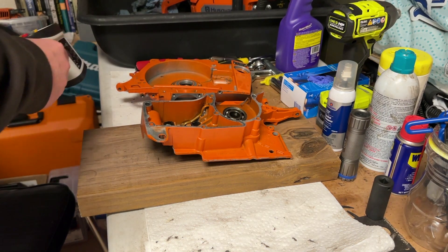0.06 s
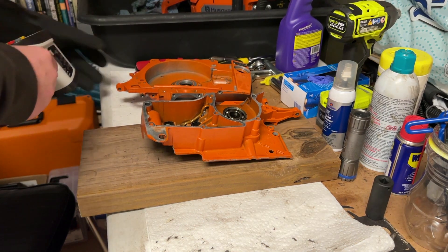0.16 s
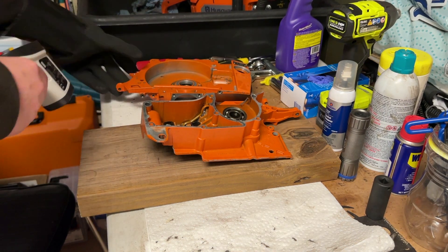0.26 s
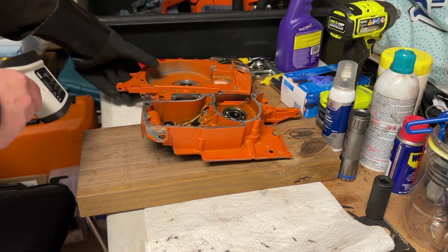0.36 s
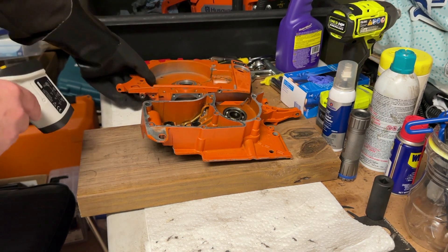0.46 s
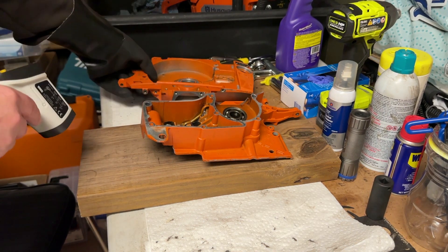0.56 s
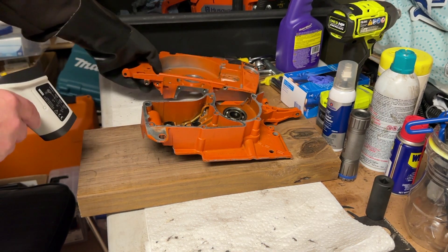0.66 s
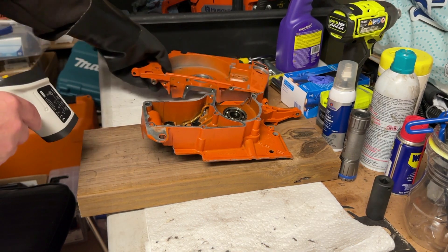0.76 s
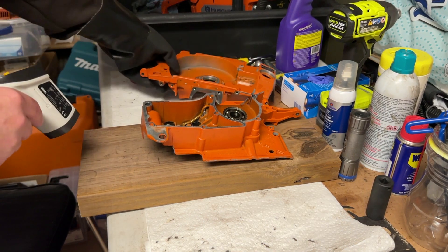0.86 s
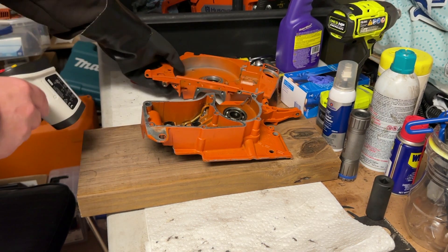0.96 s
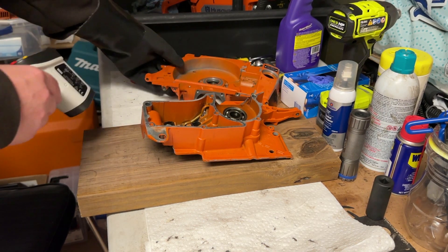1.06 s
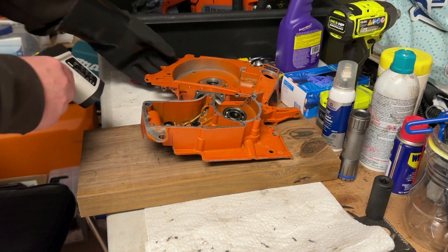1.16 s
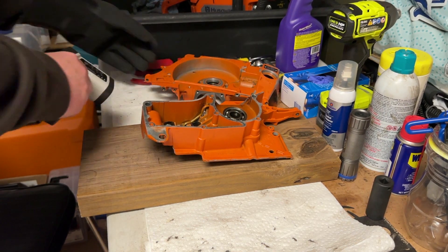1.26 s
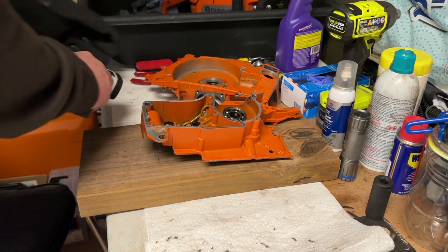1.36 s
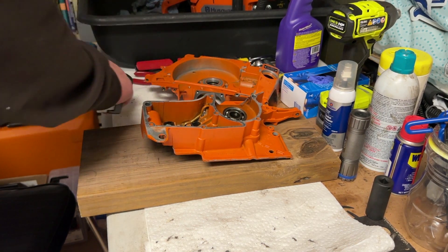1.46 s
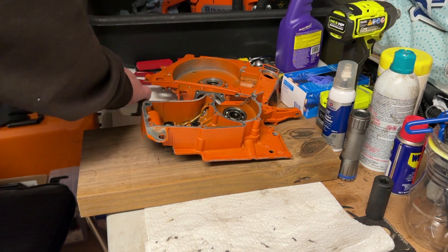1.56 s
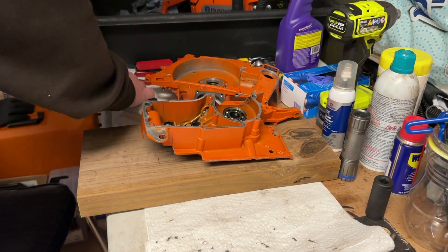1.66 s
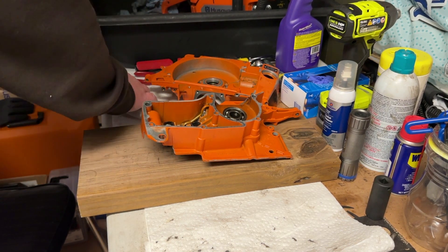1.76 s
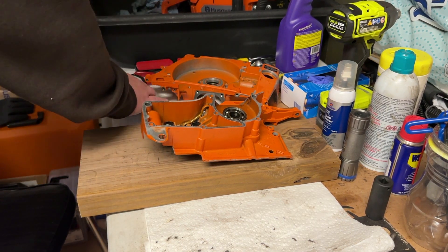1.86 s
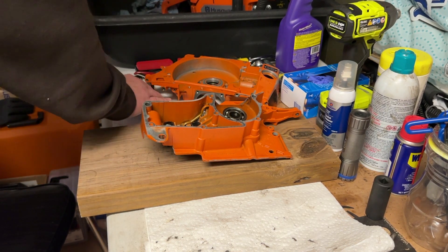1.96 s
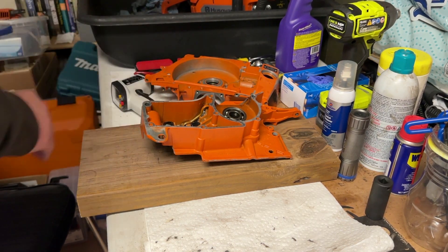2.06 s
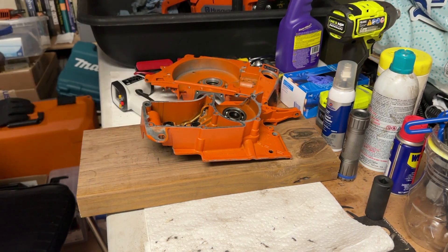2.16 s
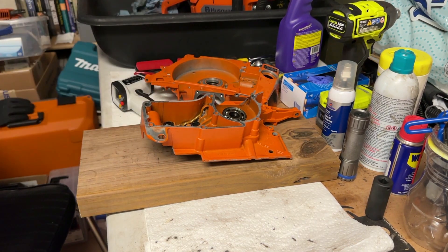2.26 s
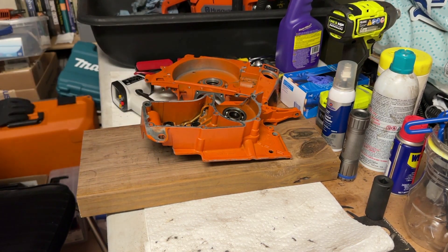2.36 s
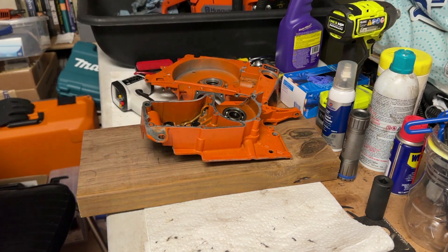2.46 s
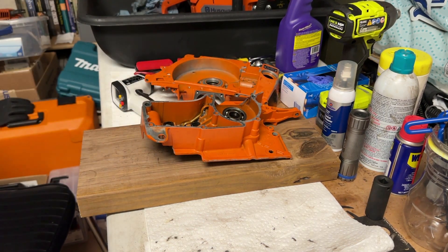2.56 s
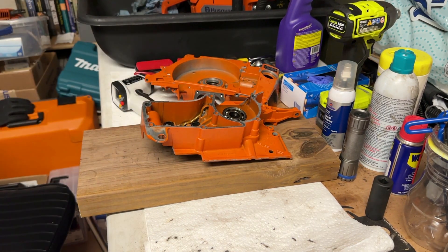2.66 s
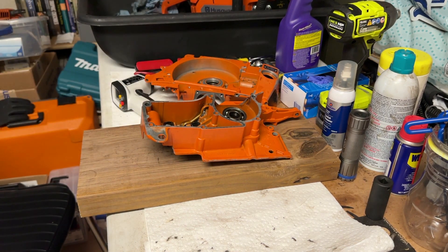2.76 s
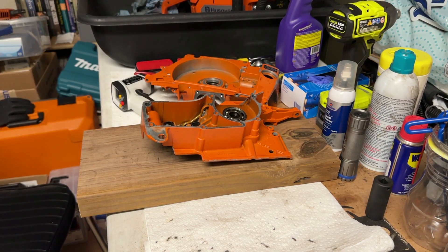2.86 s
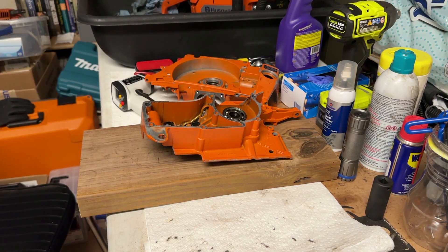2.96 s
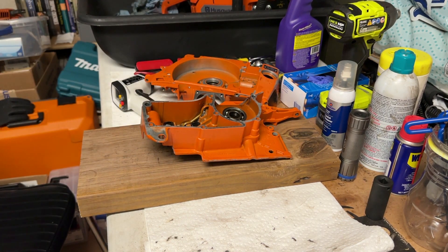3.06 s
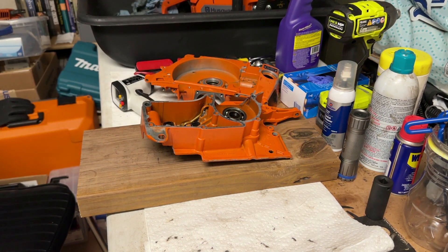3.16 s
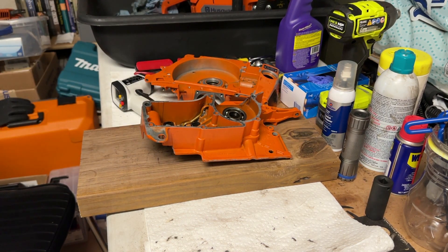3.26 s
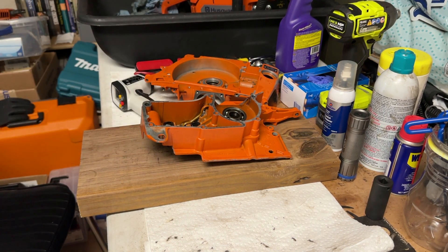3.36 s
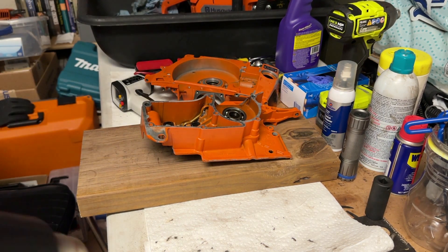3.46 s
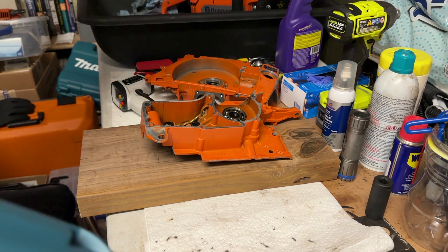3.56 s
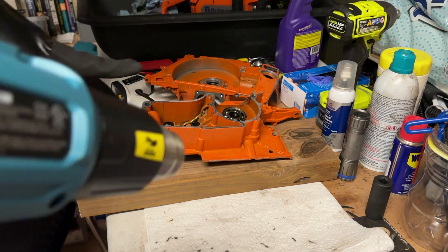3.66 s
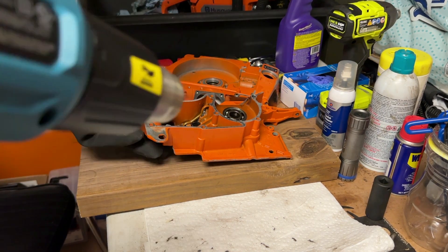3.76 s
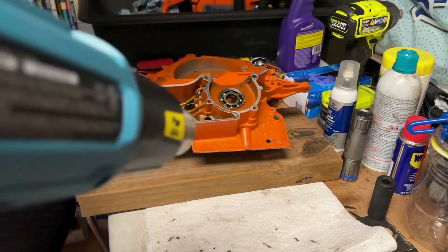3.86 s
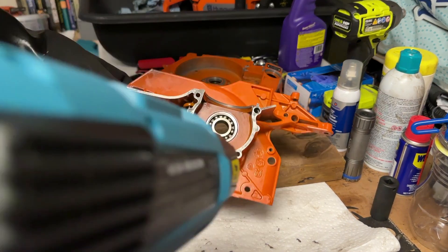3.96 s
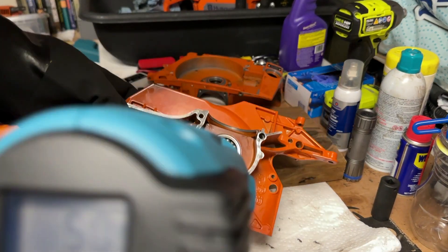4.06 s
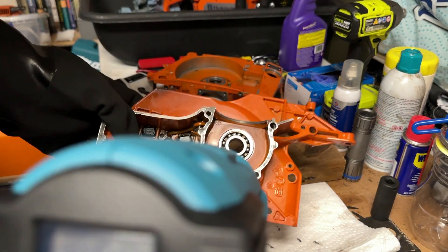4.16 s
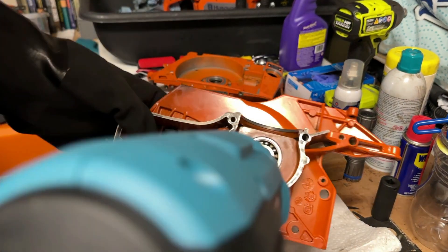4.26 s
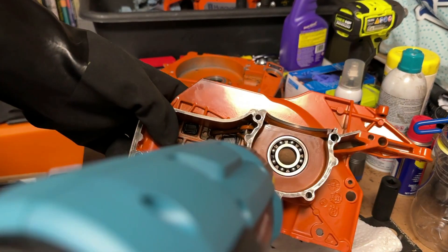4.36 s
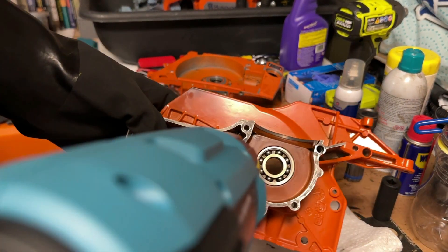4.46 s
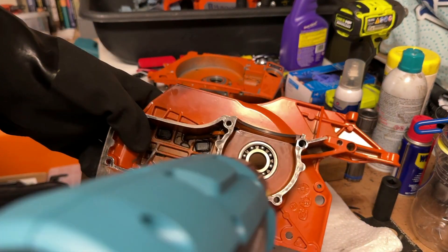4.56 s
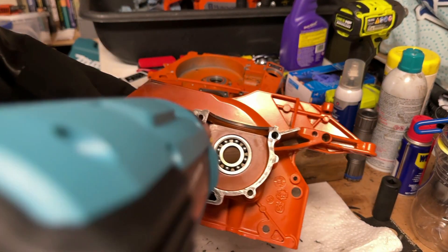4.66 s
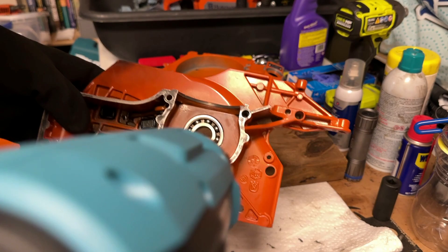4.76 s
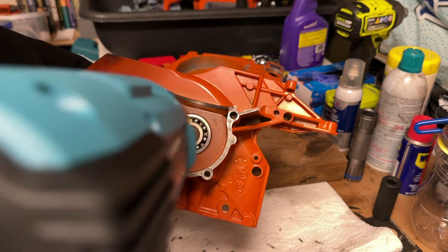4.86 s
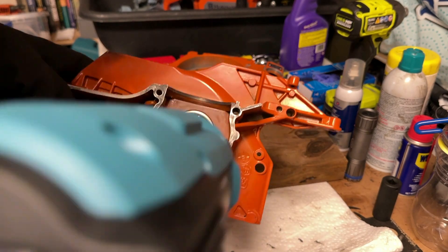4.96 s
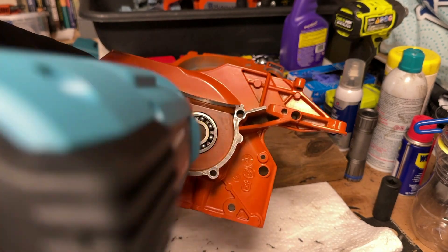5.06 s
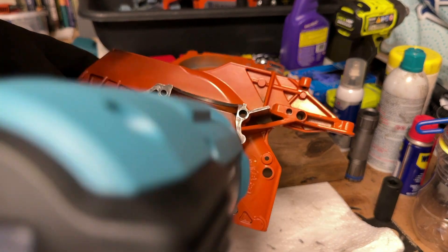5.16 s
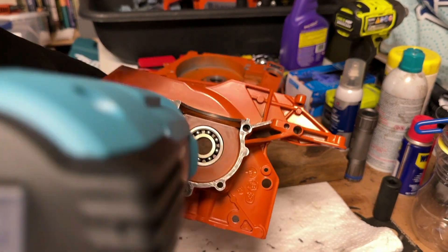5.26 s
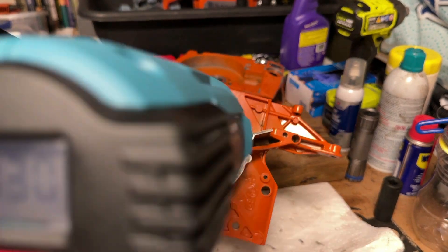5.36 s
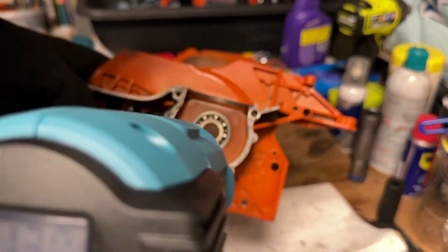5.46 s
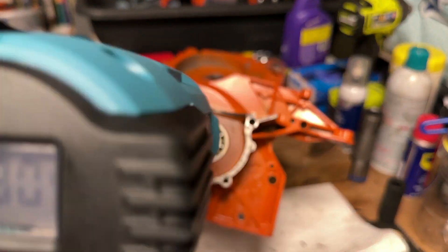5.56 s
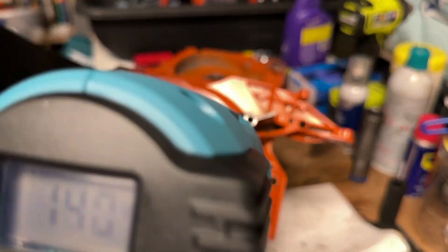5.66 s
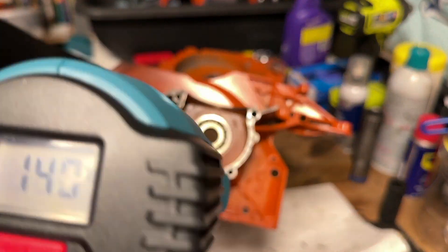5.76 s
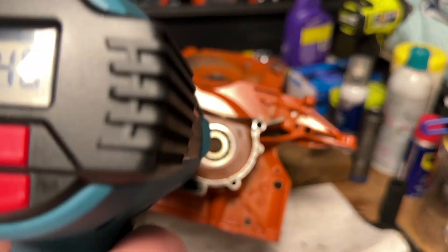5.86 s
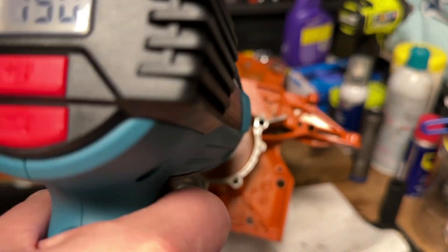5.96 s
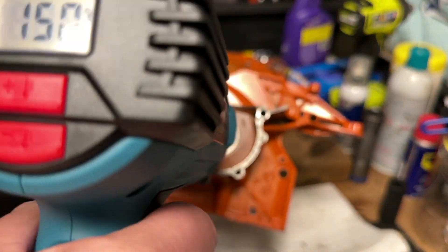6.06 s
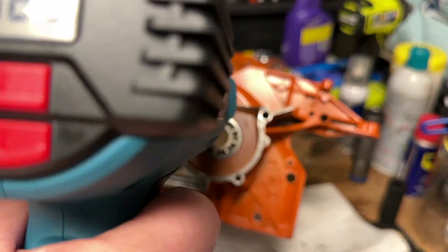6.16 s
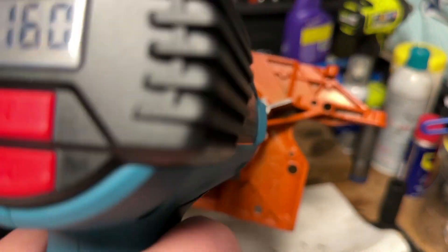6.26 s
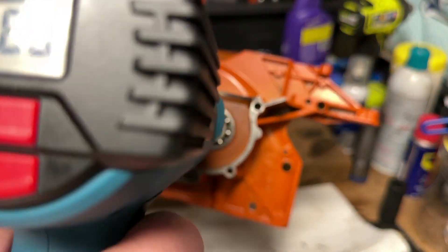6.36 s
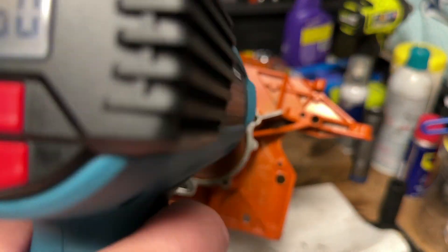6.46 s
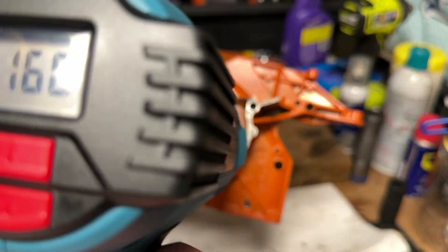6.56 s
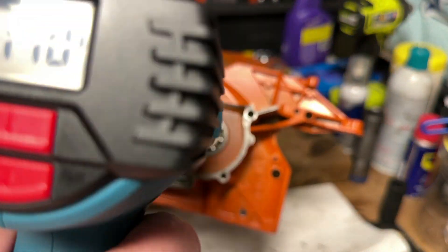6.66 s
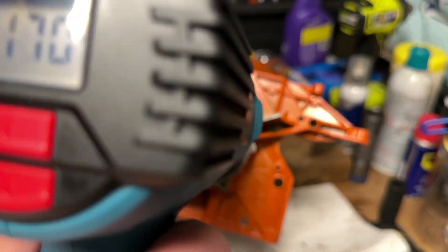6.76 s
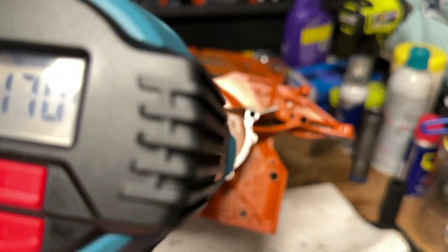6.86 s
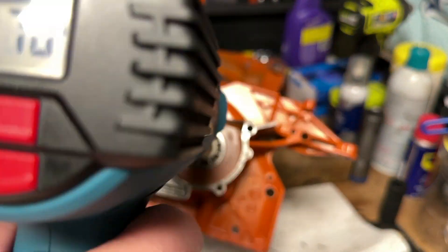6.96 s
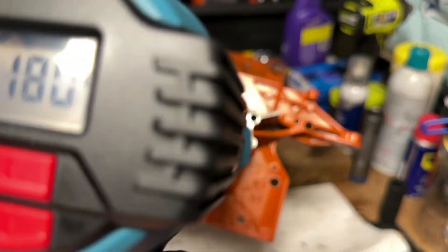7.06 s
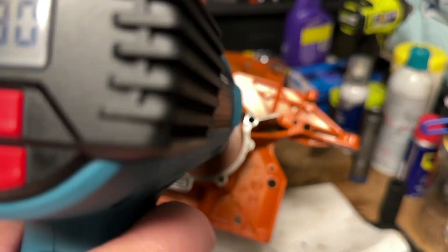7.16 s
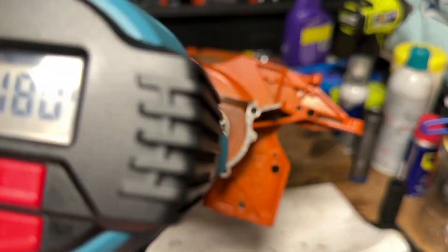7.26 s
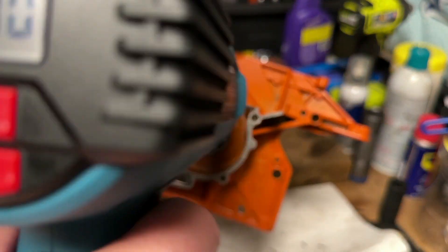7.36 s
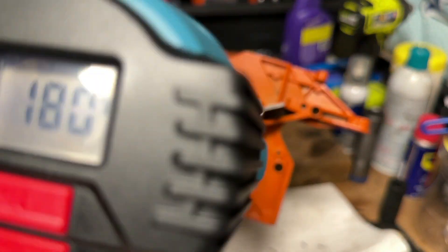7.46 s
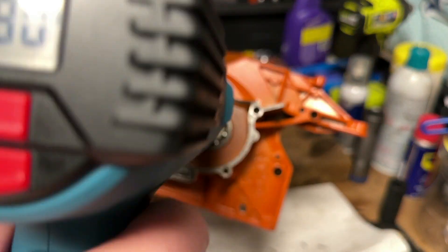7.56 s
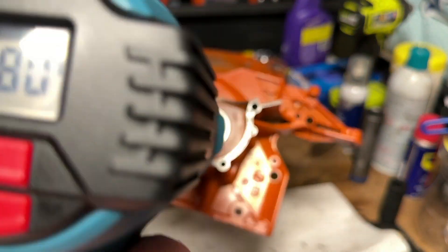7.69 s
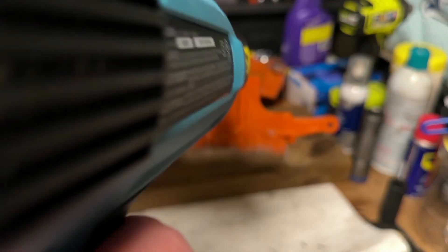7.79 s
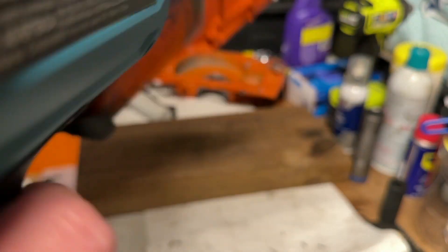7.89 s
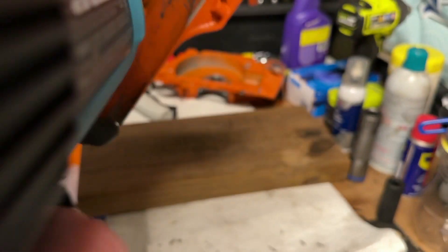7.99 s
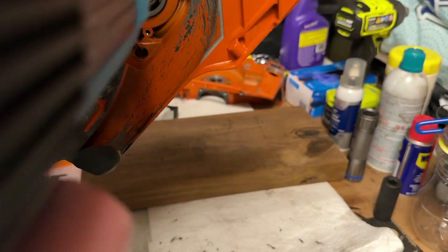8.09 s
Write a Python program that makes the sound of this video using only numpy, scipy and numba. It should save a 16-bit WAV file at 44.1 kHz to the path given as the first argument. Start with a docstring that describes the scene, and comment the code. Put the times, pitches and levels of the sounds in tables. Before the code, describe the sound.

After a metal clack, light knocks and rustling sleeves, a nearby heat gun switches on and blows steadily with a thin whine.

```python
"""Knocks on a wooden workbench, over faint workshop background: ahead of a stereo microphone a cast metal
engine case is shifted and set down with a ringing clack. Sleeves swish and things scrape over the bench.
Then a heat gun is switched on close by, to the left: its small motor spins up to about 223 turns a
second, the fan roars through the barrel and the motor whines, louder or softer as the gun is turned."""
import sys
import numpy as np
from scipy import signal
from scipy.fft import rfft, irfft, next_fast_len
from scipy.io import wavfile
from scipy.ndimage import uniform_filter1d
from numba import njit

SR = 44100
rng = np.random.default_rng(int(sys.argv[2]) if len(sys.argv) > 2 else 0)


def generate_wav(signal):
    """Clip the signal to [-1, 1] and save it as 16-bit WAV at the path in sys.argv[1]."""
    frames = np.transpose(np.atleast_2d(signal))
    scaled = np.clip(frames, -1, 1) * 32767
    pcm = np.round(scaled).astype(np.int16)
    wavfile.write(sys.argv[1], SR, pcm)


N = 358533
TIME = np.arange(N) / SR


def undb(db):
    """Decibels to gain."""
    return 10 ** (np.asarray(db) / 20)


def unit(x):
    """Scale to rms 1."""
    return x / np.sqrt(np.mean(x ** 2))


def over_time(table):
    """A (time, value) table, sample by sample."""
    return np.interp(TIME, *np.transpose(table))


def at_frequency(table, hz):
    """Value of a (frequency, value) table on a log-frequency axis."""
    f, value = np.transpose(table)
    return np.interp(np.log(np.maximum(hz, 1)), np.log(f), value)


def noise(colour, size=N):
    """Two unrelated noises of one colour, at rms 1."""
    n = next_fast_len(size, True)
    gain = undb(at_frequency(colour, np.fft.rfftfreq(n, 1 / SR)))
    spectrum = rfft(rng.standard_normal((2, n))) * gain
    return unit(irfft(spectrum, n)[:, :size])


def wander(rate_hz):
    """Random values held for 1 / rate_hz seconds and smoothed twice, at rms 1."""
    hold = int(SR / rate_hz)
    steps = np.repeat(rng.standard_normal(N // hold + 1), hold)
    return unit(uniform_filter1d(uniform_filter1d(steps, hold), hold)[:N])


@njit
def bandpass(x, hz, width):
    """State-variable band-pass with a moving centre."""
    y, band_state, low_state = np.empty(len(x)), 0., 0.
    for i in range(len(x)):
        g, damping = np.tan(np.pi * hz[i] / SR), width / hz[i]
        band = (band_state + g * (x[i] - low_state)) / (1 + g * (g + damping))
        band_state, low_state = 2 * band - band_state, low_state + 2 * g * band
        y[i] = damping * band
    return y


def resonance(hz, width):
    """Two unrelated noises in one steep resonance, whose centre may move."""
    hz, width = hz + np.zeros(N), float(width)
    white = rng.standard_normal((2, N))
    return unit(np.array([bandpass(bandpass(x, hz, width), hz, width) for x in white]))


def sine(hz, t, shape=None):
    """A sine of random phase; shape (2, 1) gives a pair."""
    return np.sin(2 * np.pi * hz * t + rng.uniform(0, 2 * np.pi, shape))


def fade(t, t60):
    """Exponential decay, 60 dB down after t60 seconds."""
    return np.exp(-np.log(1000) * t / t60)


def swell(s, length):
    """A smooth rise and fall around time s, halved a quarter of its length either side."""
    return 1 / np.cosh(np.clip(5.3 * (TIME - s) / length, -30, 30))


def add(out, s, sound):
    """Mix a sound in at time s."""
    i = int(s * SR)
    out[..., i:i + sound.shape[-1]] += sound[..., :N - i]


def microphone(pair, likeness, balance, left_lead=None):
    """Spread a common part (row 0) and a differing part (row 1) over the left and right ports."""
    n = next_fast_len(N + SR // 10, True)
    hz = np.fft.rfftfreq(n, 1 / SR)
    alike = np.clip(at_frequency(likeness, hz), 0, 1)
    ratio = undb(at_frequency(balance, hz))
    common, differing = rfft(pair, n)
    common, differing = common * np.sqrt(1 + alike), differing * np.sqrt(1 - alike)
    lag = 1 if left_lead is None else np.exp(-1j * at_frequency(left_lead, hz))
    left, right = (common + differing) * ratio, (common - differing) * lag
    return irfft(np.array([left, right]) / np.sqrt(1 + ratio ** 2), n)[:, :N]


# room tone at the bench: (frequency [Hz], relative density [dB])
ROOM_COLOUR = [(25, -7.5), (60, -1), (120, -0.5), (250, -6.5), (400, -11), (560, -10.5), (800, -18),
               (1900, -21), (4000, -28), (8000, -27.5), (9700, -23), (11500, -31.5), (16000, -32.5)]
# its course: (time [s], level [dB])
ROOM_LEVEL = [(0, -60), (2.03, -65), (2.1, -67.5), (3.4, -71.5)]


def room_tone(waver_db=.76):
    """The workshop's faint, low background noise wavers and sinks."""
    return noise(ROOM_COLOUR) * undb(over_time(ROOM_LEVEL) + waver_db * wander(4.6))


# modes of the engine case on the bench: (frequency [Hz], relative level [dB], t60 [s])
CASE_MODES = [(339, -5.5, 0.09), (678, -5, 0.06), (884, -2, 0.1), (1105, -3.5, .12), (1390, -17, .15),
              (2110, 7, .07), (2220, -0.5, 0.1), (2673, -3, .12), (2754, -5, .1), (3181, -4, .08),
              (3580, -3.5, .15), (3660, -2, .12), (4060, -3, 0.099), (4530, 3, .09), (4590, -33.5, .45),
              (5600, -6, .1), (6000, -8.5, .12), (6510, 1.5, 0.12), (7000, -7, .1), (7630, -4, .12),
              (7900, -13, 0.092), (9500, -16.5, .07)]


def case_ring(t):
    """Struck cast metal rings in decaying modes, with new phases at each blow."""
    return sum(undb(db) * fade(t, t60) * sine(hz, t, (2, 1)) for hz, db, t60 in CASE_MODES)


# knocks ahead of the microphone: (time [s], boom [dB], boom pitch [Hz], thud [dB], tick [dB], ring [dB])
KNOCKS = [(.425, -76, 200, -46.5, -55.5, -69), (.463, -67, 150, -48, -49.5, -67),
          (0.515, -33, 87, -31, -44, -51), (.595, -47, 110, -53, -52.5, -51),
          (0.821, -27.5, 84, -30.5, -34.5, -42), (.85, -42, 160, -38.5, -50, -47),
          (0.908, -40, 150, -37, -33.5, -40.5), (.934, -35, 200, -29, -48, -56),
          (1.087, -32, 88, -39.5, -50.5, -65), (1.605, -59, 150, -66.5, -76, -69),
          (1.725, -85, 151, -59.5, -63, -82), (1.855, -46, 126, -69, -53, -61),
          (1.935, -33.5, 160, -51.5, -51.5, -69), (2.265, -47.5, 260, -54.5, -63, -73),
          (2.577, -63, 139.5, -58.5, -66, -78), (3.945, -48.5, 110, -41, -57, -70)]
# modes of the wooden top: (frequency [Hz], relative level [dB], t60 [s])
BENCH_MODES = [(58, -15, 0.22), (75.7, 1, 0.31), (111, -0.5, 0.28), (130.6, -3, 0.26), (153, -1, 0.22),
               (181, -8, 0.19), (227, -8, 0.073)]
# dull and bright contact noise: (frequency [Hz], relative density [dB])
THUD_COLOUR = [(60, -15.5), (200, 5), (350, 1), (700, -3.5), (1100, -12), (2000, -26.5), (6000, -54.5)]
TICK_COLOUR = [(400, -16), (1000, 4), (2200, 3.5), (4000, -4.5), (7000, -10.5), (10000, -3.5), (15000, -17)]


def knocks(boom_rise_s=.0065, thud_t60=.23, tick_t60=.31, tail_db=-28, tail_t60=.99):
    """A tick and a thud at the contact, a faint ring of the case; the bench top booms a moment later."""
    out, t = np.zeros((2, N)), np.arange(SR // 2) / SR
    tail = undb(tail_db) * fade(t, tail_t60)
    boom_onset = 1 - np.exp(-(t / boom_rise_s) ** 2)
    for s, boom_db, boom_hz, thud_db, tick_db, ring_db in KNOCKS:
        # the place and softness of the blow favour the modes near one pitch
        boom = sum(undb(db) * np.exp(-2 * np.log2(hz / boom_hz) ** 2) * fade(t, t60) * sine(hz, t)
                   for hz, db, t60 in BENCH_MODES)
        thud = undb(thud_db) * noise(THUD_COLOUR, len(t)) * (fade(t, thud_t60) + tail)
        tick = undb(tick_db) * noise(TICK_COLOUR, len(t)) * (fade(t, tick_t60) + tail)
        ring = undb(ring_db) * case_ring(t)
        add(out[0], s, 2 * undb(boom_db) * boom * boom_onset)
        add(out, s, thud + (tick + ring) / np.sqrt(2))
    return out


# sleeve and glove strokes at the bench: (time [s], length [s], rub [dB], hiss [dB])
SWISHES = [(0.597, 0.11, -49.5, -52), (1.25, 0.66, -88.5, -66), (1.559, 0.42, -66.5, -62.5),
           (1.869, 0.13, -76, -55.5), (1.944, 0.16, -65, -57.5), (2.157, 0.072, -66, -59),
           (2.248, 0.054, -66, -53.5), (2.344, 0.097, -75, -53.5), (2.382, 0.067, -55.5, -49.5),
           (2.45, 0.06, -61, -59.5), (2.522, 0.077, -63, -63), (2.587, 0.078, -73, -64),
           (2.711, 0.045, -59.5, -62), (2.825, 0.073, -61, -67.5), (2.905, 0.066, -61.5, -61.5),
           (3.085, 0.062, -54.5, -58.5), (3.158, 0.13, -61.5, -65.5), (3.278, 0.11, -56.5, -64),
           (3.378, 0.024, -60, -45.5), (3.405, 0.042, -40.5, -30.5), (3.519, 0.19, -49.5, -67)]
# the cloth's rub and hiss: (frequency [Hz], relative density [dB])
CLOTH_RUB = [(100, -20.5), (500, -1), (1400, -1), (2500, -3.5), (4500, -15), (12000, -25.5)]
CLOTH_HISS = [(800, -15), (2700, -3), (5000, -1), (7000, 1), (8300, -2), (9700, 4.5), (11000, -9.5),
              (15500, -19.5)]


def sleeves(grain_db=.8):
    """Cloth slides over cloth in short, slightly grainy strokes."""
    rub, hiss = 0, 0
    for s, length, rub_db, hiss_db in SWISHES:
        stroke = swell(s, length)
        rub += undb(rub_db) * stroke
        hiss += undb(hiss_db) * stroke
    return (rub * noise(CLOTH_RUB) + hiss * noise(CLOTH_HISS)) * undb(grain_db * wander(250))


# metal meets metal on the bench, a double clack: (time [s], level [dB])
CLACKS = [(0.9334, -10.5), (0.9359, -8)]
# its contact noise: (frequency [Hz], relative density [dB])
CRACK_COLOUR = [(150, -19.5), (700, -8), (1400, -8), (2200, 0.5), (3000, 0.5), (4200, -0.5), (7700, -6),
                (8500, -17), (10200, -9.5), (13000, -24), (16000, -30.5)]


def clack(ring_db=-9, rise_s=.00038, crack_t60=.024,
          scatter_db=-13, scatter_t60=.18, tail_db=-42, tail_t60=.35):
    """A sharp crack sets the cast case ringing; the cluttered bench scatters it."""
    out, t = np.zeros((2, N)), np.arange(SR // 2) / SR
    onset = 1 - np.exp(-t / rise_s)
    echoes = undb(scatter_db) * fade(t, scatter_t60) + undb(tail_db) * fade(t, tail_t60)
    for s, db in CLACKS:
        ring = undb(ring_db) * case_ring(t)
        crack = noise(CRACK_COLOUR, len(t)) * (fade(t, crack_t60) + echoes)
        add(out, s, undb(db) * onset * (ring + crack))
    return out


# bumps on the microphone, the same at both ports: (time [s], length [s], pitch [Hz], level [dB])
BUMPS = [(1.93, .2, 36, -62), (2.556, 0.097, 53.8, -65), (3.967, 0.046, 63.3, -41), (6.158, .1, 40, -45),
         (6.266, 0.049, 32, -47), (6.415, 0.06, 44.1, -42), (6.56, 0.068, 34, -39), (6.71, 0.09, 41.4, -39),
         (6.84, 0.066, 31, -44), (6.985, 0.018, 54.6, -31), (7.706, 0.053, 55.14, -48),
         (7.855, 0.068, 49, -50)]


def bumps():
    """Soft low bumps on the microphone, each a few slow cycles."""
    return np.sqrt(2) * sum(undb(db) * swell(s, length) * sine(hz, TIME) for s, length, hz, db in BUMPS)


# things slid over the bench: (time [s], length [s], level [dB])
SCRAPES = [(2.82, 0.081, -60), (2.893, .075, -54.5), (3.093, 0.062, -56.5), (3.278, 0.068, -50)]
# their hollow resonances: (frequency [Hz], width [Hz], relative level [dB])
HOLLOW_BANDS = [(725, 310, -3), (990, 330, -2), (1365, 120, -3), (1930, 270, -5), (2410, 300, -20)]


def scrapes(grain_db=.5):
    """Short grainy strokes of friction ring a hollow body."""
    strokes = sum(undb(db) * swell(s, length) for s, length, db in SCRAPES)
    body = unit(sum(undb(db) * resonance(hz, width) for hz, width, db in HOLLOW_BANDS))
    return strokes * body * undb(grain_db * wander(200))


SWITCH_ON_S, FULL_SPEED_HZ = 3.4254, 224.3


def shaft_speed(run_up_s=.2304, cold_sag_hz=12.4, warm_up_s=1.82,
                hunt_hz=.22, hunt_period_s=.47, hunt_crest_s=5.35):
    """Turns per second: a quick run-up, a slow creep as the motor warms, and slight hunting."""
    t = np.maximum(TIME - SWITCH_ON_S, 0)
    run_up = FULL_SPEED_HZ * (1 - np.exp(-t / run_up_s))
    sag = cold_sag_hz * np.exp(-t / warm_up_s)
    hunting = hunt_hz * np.cos(2 * np.pi * (TIME - hunt_crest_s) / hunt_period_s)
    return np.maximum(run_up - sag + hunting, 1)


# motor tones at close range:
# (shaft multiple [rounded when played], side-on [dB], rear-on [dB], gain with vent nearness [dB/dB])
MOTOR_TONES = [(1, -54, -48.5, 1.53), (4, -62, -49.5, -0.5), (5, -51.5, -48, -0.1), (7, -53, -50.5, 0.05),
               (8, -58, -54, 0.7), (10, -57.5, -50.5, -2.5), (15, -57, -52, 0.9), (16, -58, -54, 0.57),
               (24, -61.5, -61.5, 1.56), (25, -60.5, -63, 1.5), (29, -69.5, -72, -4),
               (30, -60.5, -63, 1.53), (31, -71, -74, -3), (35, -64, -56, 1), (39, -75, -68, 1.9),
               (40, -57, -61, 2.5), (41, -76, -82, 2.9), (44, -80, -82, 2.5), (45, -68, -62, .9),
               (46, -92, -62, 1), (50, -57, -54, 1), (55, -61, -69, 3), (65.4, -69, -54, .2),
               (66.1, -58, -61, 1.5), (69.9, -60, -80, 4), (70.6, -64, -88, 4.5)]
# the housing lifts tones that pass through its resonances: (frequency [Hz], gain [dB])
HOUSING_GAIN = [(4700, 0), (5300, 9), (5850, -3), (6200, 21.5), (6700, 14.5), (7300, 5), (8400, 1),
                (8750, 16.5), (9100, 16.5), (9400, 14), (9700, 28), (10050, 10), (10700, -4), (14400, 4),
                (15150, -2)]


def motor(shaft_hz, rear, near_db, waver_db=2.03, flutter_db=.76, build_up_s=.32):
    """Unbalance, blades and commutator give shaft harmonics, weighted by the housing and the gun's aim."""
    speed = shaft_hz / FULL_SPEED_HZ
    jitter = .00009 + .13 * (1 - speed) ** 2  # the shaft runs unevenly until it is up to speed
    turns = np.cumsum(shaft_hz * (1 + jitter * wander(90))) / SR
    tones = 0
    for multiple, side_db, rear_db, near_slope in MOTOR_TONES:
        order = round(multiple)
        aim_db = side_db + rear * (rear_db - side_db) + near_slope * near_db
        db = aim_db + at_frequency(HOUSING_GAIN, order * shaft_hz) + waver_db * wander(6)
        growth = speed ** (.05 + .055 * order)  # high tones need more speed to sound
        tones += undb(db) * growth * sine(order, turns)
    build_up = np.clip((TIME - SWITCH_ON_S) / build_up_s, 0, 1) ** 2
    return np.sqrt(2) * tones * build_up * undb(flutter_db * wander(110))


# air in the barrel and at the vents, close up: (frequency [Hz], relative density [dB])
BARREL_ROAR = [(20, -38), (60, -10), (150, -9.5), (300, -4), (420, -3), (560, 1), (760, -1.5), (1050, 1),
               (1300, -3.5), (1800, -5), (2800, -8), (3450, -11.5), (4200, -21), (8000, -41)]
VENT_HISS = [(2500, -8), (3900, -7.5), (4500, -7), (5200, -2.5), (5900, -3), (6600, -1.5), (7500, -0.5),
             (8400, -5.5), (9600, 3.5), (10400, -5), (11500, -12), (13300, -10.5), (14800, -18),
             (16000, -5.5)]
# blade turbulence at full speed, side-on: (shaft multiple, width [Hz], level [dB])
SWIRL_BANDS = [(4.3, 184, -39), (4.89, 132, -36), (9.5, 230, -45)]


def airflow(shaft_hz, rear, near_db, roar_db=-35, roar_rear_db=1, swirl_glide=.72, swirl_rear_db=-.84,
            note_hz=587, note_width_hz=160, note_db=-49, hiss_db=-39, gust_db=.56):
    """Air roars and sounds a hollow note in the barrel, swirls off the blades and hisses at the vents."""
    speed = shaft_hz / FULL_SPEED_HZ
    roar = noise(BARREL_ROAR) * undb(roar_db + roar_rear_db * rear) * speed ** 3
    swirl_hz = (FULL_SPEED_HZ + swirl_glide * (shaft_hz - FULL_SPEED_HZ)) * (1 + .0028 * wander(25))
    swirl = sum(undb(db) * resonance(multiple * swirl_hz, width) for multiple, width, db in SWIRL_BANDS)
    swirl *= undb(swirl_rear_db * rear) * speed ** 4.1
    note = undb(note_db) * resonance(note_hz, note_width_hz) * speed ** 2
    hiss = noise(VENT_HISS) * undb(hiss_db + near_db) * speed ** 1.25
    rush = (roar + swirl + note) * undb(.33 * near_db)  # nearness lifts these less than the hiss
    return (TIME > SWITCH_ON_S) * (rush + hiss) * undb(gust_db * wander(9))


# the vents grow louder as they near the microphone: (time [s], relative level [dB])
VENT_LEVEL = [(3.95, -51.5), (4.05, -47), (4.16, -51), (4.3, -51), (4.33, -50), (5.17, -48.5), (5.88, -51),
              (6.38, -50), (6.76, -50), (7.84, -50), (7.95, -43.5), (8.13, -43.5)]
# the gun at the two ports: (frequency [Hz], likeness [0-1])
GUN_LIKENESS = [(60, .97), (300, .88), (1000, .88), (3000, .54), (6000, .48), (9000, .88), (13000, .76)]
# it is louder on the left: (frequency [Hz], left minus right [dB])
GUN_BALANCE = [(60, 1.0), (110, 1.5), (200, 1), (380, 6.1), (700, 10.4), (1290, 8.4), (2380, 5.3),
               (4400, 1), (8120, 0.9), (15000, 0.1)]
# and reaches the left port first: (frequency [Hz], phase lead [rad])
GUN_LEFT_LEAD = [(200, 0.15), (1500, 0.73), (5000, 1.1), (8500, 2.04), (10400, 0.39), (13000, 0.78)]


def heat_gun(mid_turn_s=5.87, turn_length_s=.4):
    """Motor and air, close on the left; the gun turns its rear to the microphone and ends very near."""
    shaft_hz = shaft_speed()
    rear = np.clip(.5 + (TIME - mid_turn_s) / turn_length_s, 0, 1)  # 0 side-on, 1 rear-on
    vents_db = over_time(VENT_LEVEL)
    near_db = vents_db - np.median(vents_db[TIME > SWITCH_ON_S])
    sound = airflow(shaft_hz, rear, near_db)
    sound[0] += motor(shaft_hz, rear, near_db)  # the whine is common to both ports
    return microphone(sound, GUN_LIKENESS, GUN_BALANCE, GUN_LEFT_LEAD)


# the bench at the two ports, alike in the bass, diffuse in the treble: (frequency [Hz], likeness [0-1])
BENCH_LIKENESS = [(130, 0.9), (300, 0.9), (700, 0.37), (3000, 0.33), (7000, -0.05), (12000, .6)]
# it lies almost straight ahead: (frequency [Hz], left minus right [dB])
BENCH_BALANCE = [(120, .7), (400, 2), (2000, 1.1), (9000, 1)]
# the level of bench and room dips briefly: (time [s], gain [dB])
LEVEL_DIP = [(2.035, -9), (2.055, -36.5), (2.085, -37.5), (2.115, -4)]


def scene():
    """One microphone position in the workshop: the bench ahead, the heat gun close on the left."""
    ahead = room_tone() + knocks() + sleeves() + clack() + scrapes()
    bench = microphone(ahead, BENCH_LIKENESS, BENCH_BALANCE) * undb(over_time(LEVEL_DIP))
    return bench + bumps() + heat_gun()


def record(dry):
    """The recorder cuts the top steeply."""
    top_hz = 15800
    return signal.sosfilt(signal.ellip(10, .2, 80, top_hz, fs=SR, output="sos"), dry)


dry = scene()
out = record(dry)
generate_wav(out)
```